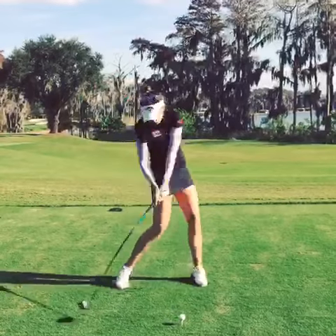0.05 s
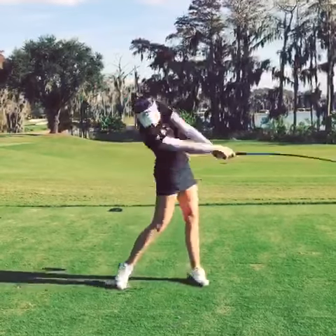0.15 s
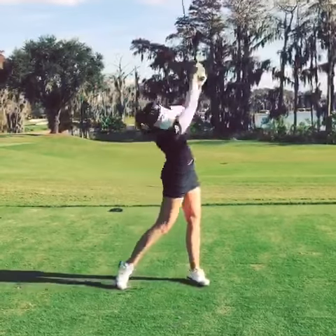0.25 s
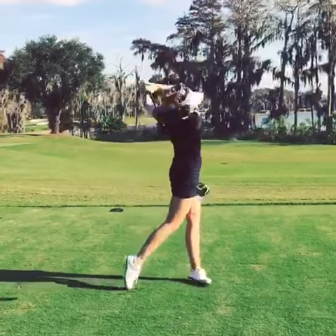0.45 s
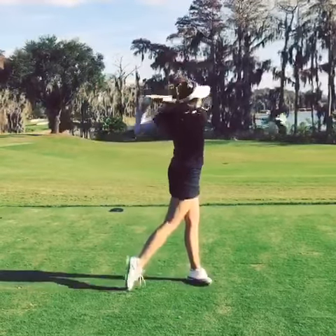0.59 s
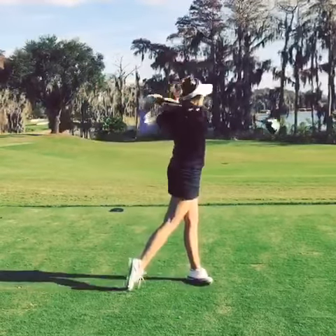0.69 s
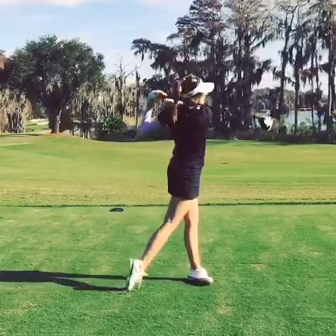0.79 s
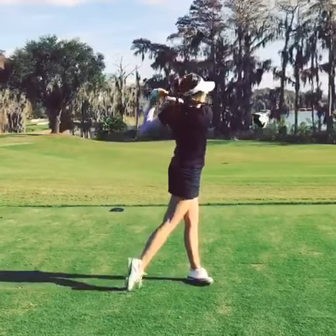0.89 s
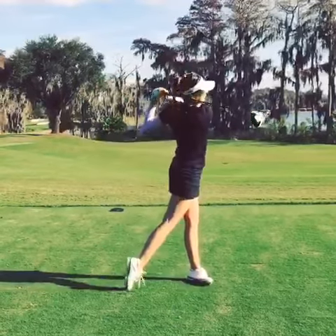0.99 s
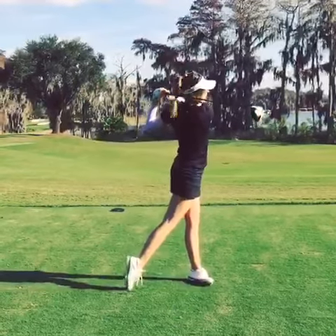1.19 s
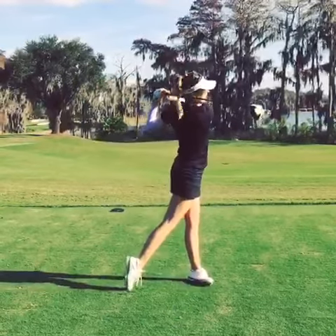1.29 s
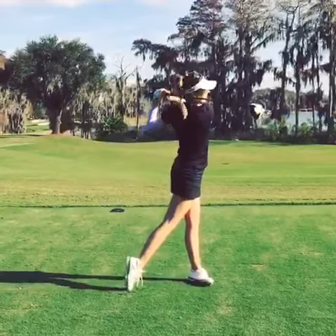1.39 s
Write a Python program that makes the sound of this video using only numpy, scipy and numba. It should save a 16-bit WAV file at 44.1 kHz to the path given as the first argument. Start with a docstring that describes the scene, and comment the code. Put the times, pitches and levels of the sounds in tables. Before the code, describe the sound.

Golf drive on an open grassy course: a very short swelling swish, one piercing crack with a hollow metal ping, then a quickly fading noisy echo, quiet air hiss and distant low rumble, picked up by a nearby phone.

```python
"""Open-air hiss over a distant wavering engine rumble; then a golf driver whistles down through the air
and cracks a ball off the tee, a few metres from a phone. The whistle is noise in moving narrow bands.
The strike sums a short blow, a noise crack, high rattle and the decaying modes of the hollow metal head.
It echoes as noise washes, first a near one off ground and body, then tree lines; the head's motion
shifts the pitch of their blow and ring. The crack overloads the phone, which flattens its peaks."""
import sys
import numpy as np
from scipy import signal
from scipy.fft import rfft, irfft
from scipy.io import wavfile
from scipy.ndimage import uniform_filter1d
from numba import njit

SR = 44100
rng = np.random.default_rng(int(sys.argv[2]) if len(sys.argv) > 2 else 0)


def store_pcm(level_fs):
    """Save levels as 16-bit WAV."""
    pcm = np.round(np.clip(level_fs, -1, 1) * 32767).astype(np.int16)
    wavfile.write(sys.argv[1], SR, np.atleast_2d(pcm).T)


def linear_from_db(decibels):
    """Turn decibels (scalar or array-like) into linear amplitude factors; 0 gives 1."""
    return 10 ** (np.asarray(decibels, float) / 20)


N = 63945  # samples
STRIKE_S = .2277


def level(x, db):
    """Scale to an rms level."""
    return x * linear_from_db(db) / np.sqrt(np.mean(x ** 2))


def spectrum_db(hz, points):
    """Interpolate (hz, db) points along log frequency."""
    p = np.array(points, float)
    return np.interp(np.log(hz + 1), np.log(p[:, 0]), p[:, 1])


def coloured(points, size):
    """Noise with a (hz, db) spectrum, rms 1."""
    hz = np.arange(size // 2 + 1) * SR / size
    white = rfft(rng.standard_normal(size))
    return level(irfft(white * linear_from_db(spectrum_db(hz, points)), size), 0)


def fade(t, t60_s):
    """Exponential decay: 60 dB in t60_s from t = 0."""
    return linear_from_db(-60 * np.maximum(t, 0) / t60_s)


@njit
def svf(x, hz, width_hz):
    """State-variable band-pass whose centre moves."""
    y, band, low = np.empty(len(x)), 0., 0.
    for i in range(len(x)):
        g = np.tan(np.pi * hz[i] / SR)
        q = hz[i] / width_hz
        v = (band + g * (x[i] - low)) / (1 + g * (g + 1 / q))
        band, low = 2 * v - band, low + 2 * g * v
        y[i] = v / q
    return y


def noise_band(centre_hz, width_hz):
    """White noise through two equal band-passes in series."""
    once = svf(rng.standard_normal(N), centre_hz, width_hz)
    return svf(once, centre_hz, width_hz)


def steady(x, size):
    """Even out the slow chance level of a noise band."""
    power = uniform_filter1d(uniform_filter1d(x ** 2, size), size)
    return x / np.sqrt(power + 0.045 * np.mean(x ** 2))


# open-air spectrum: freq_hz, density_db (per Hz, relative)
AIR_SPECTRUM = [(12, -46.5), (20, -17), (38, -1.5), (81, -5), (130, -12), (198, -30), (590, -40),
                (1060, -37.5), (1480, -41), (14300, -57), (16000, -64.5)]
AIR_DB = -51  # rms before the lows are taken out
# engine swell: time_s, gain_db
RUMBLE_SWELL = [(0.0, -44), (0.164, -65.5), (0.238, -84.5), (0.286, -71), (0.334, -56), (0.504, -61.5),
                (0.548, -49.5), (0.596, -54), (0.852, -54), (0.872, -63), (0.98, -52), (1.122, -58),
                (1.138, -49.5), (1.268, -54.5), (1.292, -63), (1.312, -53.5), (1.436, -46.5), (1.45, -54)]
RUMBLE_HZ, RUMBLE_WIDTH_HZ = 78., 24.


def course(t):
    """Open-air hiss; engine rumble as a narrow hum plus the air's lows, on a wavering level."""
    swell = np.array(RUMBLE_SWELL, float)
    hum = level(noise_band(np.full(N, RUMBLE_HZ), RUMBLE_WIDTH_HZ), 0)
    air = coloured(AIR_SPECTRUM, size=N) * linear_from_db(AIR_DB)
    low = signal.sosfiltfilt(signal.butter(4, 150, fs=SR, output="sos"), air)
    hiss = air - low
    rumble = steady(0.51 * level(low, 0) + hum, size=1800)
    return hiss + rumble * linear_from_db(np.interp(t, swell[:, 0], swell[:, 1]))


# shaft through the air: time_s, whistle_db, vortex_hz
SWING_PATH = [(.10, -85, 350), (0.137, -58.5, 445), (.16, -51, 650), (.175, -39.5, 760), (0.191, -35, 805),
              (.205, -29.5, 880), (.218, -26.5, 917.7), (.226, -42, 800), (0.235, -35.5, 650),
              (.25, -47.5, 591), (0.278, -55.5, 450), (.31, -54, 430), (.35, -60, 370), (0.411, -79, 300),
              (0.458, -56.5, 310), (.49, -62.5, 400), (.53, -75, 500), (0.599, -83, 500)]
WHISTLE_WIDTH_HZ = 170.
HEAD_WAKE_RATIO, HEAD_WAKE_DB, HEAD_WAKE_WIDTH_HZ = .7, -6, 350.  # ratio to shaft pitch
# the shaft wraps round the shoulders
FINISH_S, FINISH_WIDTH_S = 0.487, 0.046
FINISH_HZ, FINISH_BAND_HZ, FINISH_DB = 650., 590., -60.5
# broad turbulence: freq_hz, density_db (per Hz, relative)
RUSH_SPECTRUM = [(60, -8), (150, -3), (330, -9.5), (800, -7.5), (1600, -12.5), (2500, -13), (4750, -18.5),
                 (9000, -25), (14200, -30), (16000, -40.5)]
RUSH_DB, RUSH_PEAK_S = -38, .208
RUSH_RISE_DB_PER_S2, RUSH_FALL_DB_PER_S = 8005, 298


def swish(t):
    """Vortices off shaft and head whistle at a pitch set by speed, over broad turbulence."""
    path = np.array(SWING_PATH, float)
    vortex_hz = np.interp(t, path[:, 0], path[:, 2])
    shaft = steady(noise_band(vortex_hz, WHISTLE_WIDTH_HZ), size=800)
    wake = steady(noise_band(vortex_hz * HEAD_WAKE_RATIO, HEAD_WAKE_WIDTH_HZ), size=800)
    whistle = (shaft + linear_from_db(HEAD_WAKE_DB) * wake) * linear_from_db(np.interp(t, path[:, 0], path[:, 1]))

    wrap = steady(noise_band(np.full(N, FINISH_HZ), FINISH_BAND_HZ), size=800)
    finish = wrap * linear_from_db(FINISH_DB) * np.exp(-((t - FINISH_S) / FINISH_WIDTH_S) ** 2)

    off_s = t - RUSH_PEAK_S
    slope_db = np.where(off_s < 0, -RUSH_RISE_DB_PER_S2 * off_s ** 2, -RUSH_FALL_DB_PER_S * off_s)
    rush = coloured(RUSH_SPECTRUM, size=N) * linear_from_db(RUSH_DB + slope_db)
    return whistle + rush + finish


# modes of the hollow head: freq_hz, level_db (relative), t60_s
HEAD_MODES = [(3096, -5.5, 0.087), (3032, -14, 0.065), (4110, -7.5, 0.063), (4250, -18.5, 0.074),
              (6480, -15, 0.098), (7680, -15.5, 0.046), (8120, -21, .05), (8410, -18.5, 0.15),
              (8700, -19.5, .05), (9500, -18, .04), (9975, -12, 0.09), (11370, -14.5, 0.044),
              (11800, -20, 0.14), (13300, -18.5, 0.097), (12660, -23, .04), (15280, -12, 0.024)]
RING_DB, BUILD_CYCLES, TURN_AWAY_S = -4.5, 16, 0.03  # the shell rings up, then the face swings away
# crack spectrum: freq_hz, density_db (per Hz, relative)
CRACK_SPECTRUM = [(59, -43.5), (100, -14.5), (1420, -12.5), (2000, -12), (3050, -6), (4870, -9), (9820, -6),
                  (13200, -11.5), (14400, -3), (16000, -28)]
CRACK_DB, CRACK_HOLD_S, CRACK_T60_S = -7, 0.0036, 0.025
RATTLE_DB, RATTLE_T60_S, RATTLE_HZ = -16.5, 0.07, 4964  # dense high shell modes, above RATTLE_HZ
BLOW_HZ, BLOW_DB, BLOW_T60_S = 1366, -7.5, 0.0079  # the ball squashed on the face
SAG_PER_S = -.8  # pitch glide of the direct strike


def strike(ratio, glide_per_s, ring_db):
    """Blow, crack, dense high modes and ringing head; ratio and glide shift blow and ring pitch."""
    t = np.arange(int(.15 * SR)) / SR
    heard_s = ratio * t * (1 + glide_per_s * t / 2)
    ring = 0
    for k, (hz, db, t60_s) in enumerate(HEAD_MODES):
        build = 1 - np.exp(-t * hz / BUILD_CYCLES)
        ring = ring + linear_from_db(db) * fade(t, t60_s) * build * np.sin(2 * np.pi * hz * heard_s + k * k)
    ring = ring / (1 + (t / TURN_AWAY_S) ** 8) ** .5
    crack = coloured(CRACK_SPECTRUM, size=len(t)) * fade(t - CRACK_HOLD_S, CRACK_T60_S)
    high_pass = signal.butter(2, RATTLE_HZ, "high", fs=SR, output="sos")
    rattle = signal.sosfilt(high_pass, rng.standard_normal(len(t))) * fade(t, RATTLE_T60_S)
    blow = np.sin(2 * np.pi * BLOW_HZ * heard_s) * fade(t, BLOW_T60_S)
    return (linear_from_db(RING_DB + ring_db) * ring + linear_from_db(CRACK_DB) * crack
            + linear_from_db(BLOW_DB) * blow + linear_from_db(RATTLE_DB) * rattle)


# echoes, first a near one off ground and body, then tree lines: delay_s, level_db (relative),
# hold_s, t60_s, doppler_ratio, ring_db (extra ring sent that way)
ECHOES = [(0.021, -38, 0.044, 0.132, 1.02, 1), (0.102, -49.5, 0.02, 1, .99, -13),
          (.19, -45.5, 0.024, 0.55, .95, -4), (0.29, -55.5, 0.0089, 0.084, 0.74, 3),
          (.39, -60.5, 0.041, 0.84, .97, -3)]
# radiated towards the trees and returned by leaves: freq_hz, gain_db (in full from LEAFY_FROM_S on)
LEAF_COLOUR = [(200, -22), (900, -2), (2000, 1.3), (3000, -5), (4000, 1.7), (4800, -4), (6200, 3.5),
               (6900, 0.7), (7400, 8), (7900, -1.5), (9600, -1.1), (11500, -2.5), (14000, -6.5),
               (16000, -11)]
LEAFY_FROM_S = 0.056  # nearer echoes keep more of the strike's own colour
AIR_DB_PER_KHZ_S, SLOWING_PER_S, ECHO_RISE_S = -3, -2.5, .012


def echoes(t):
    """Each echo smears the strike into a wash, leafier when later."""
    hz = np.arange(N // 2 + 1) * SR / N
    out = 0
    for delay_s, db, hold_s, t60_s, ratio, ring_db in ECHOES:
        late_s = t - STRIKE_S - delay_s
        rise = np.clip(late_s / ECHO_RISE_S, 0, 1) ** 2
        scatter = rng.standard_normal(N) * rise * fade(late_s - ECHO_RISE_S - hold_s, t60_s)
        wash = signal.fftconvolve(scatter, strike(ratio, SLOWING_PER_S, ring_db))[:N]
        air_loss_db = AIR_DB_PER_KHZ_S * hz / 1000 * delay_s
        leaf_db = min(delay_s / LEAFY_FROM_S, 1) * spectrum_db(hz, LEAF_COLOUR)
        dulled = irfft(rfft(wash) * linear_from_db(air_loss_db + leaf_db), N)
        out = out + linear_from_db(db - 20) * dulled  # -20: convolving with noise adds gain
    return out


def scene():
    """Background, swish, strike and echoes at the phone."""
    t = np.arange(N) / SR
    out = course(t) + swish(t) + echoes(t)
    hit, at = strike(1, SAG_PER_S, 0), int(STRIKE_S * SR)
    out[at:at + len(hit)] += hit
    return out[None]


def low_pass(x):
    """Removes everything above the highest recorded frequency."""
    return signal.sosfilt(signal.butter(12, 16310, fs=SR, output="sos"), x)


CLIP, TOP_HZ = .6, 14880  # CLIP: peak amplitude ceiling


def record(dry):
    """The phone cuts the top, flattens the peaks and cuts the top again."""
    top = signal.ellip(8, .3, 45, TOP_HZ, fs=SR, output="sos")
    cut = signal.sosfilt(top, dry)
    flat = cut / (1 + np.abs(cut / CLIP) ** 6) ** (1 / 6)
    return low_pass(signal.sosfilt(top, flat))


dry = scene()
out = record(dry)
store_pcm(out)
```